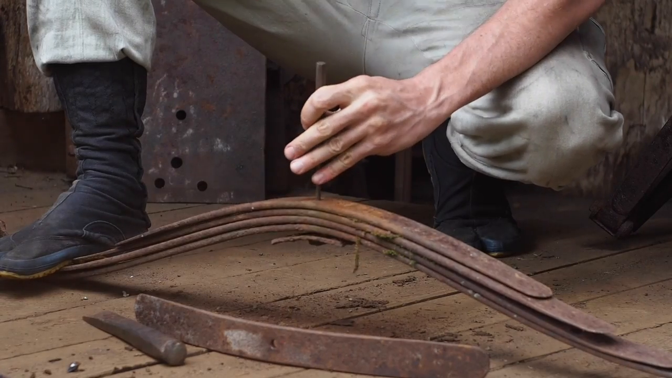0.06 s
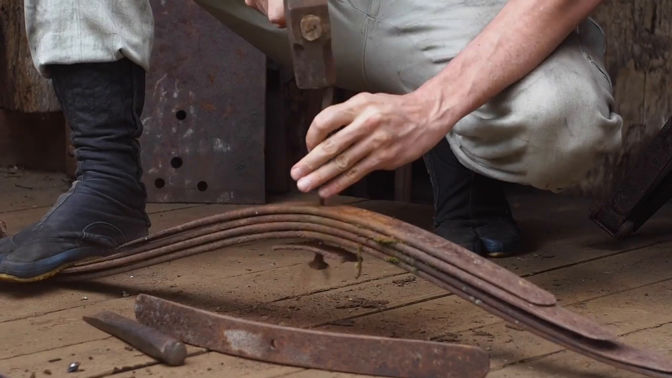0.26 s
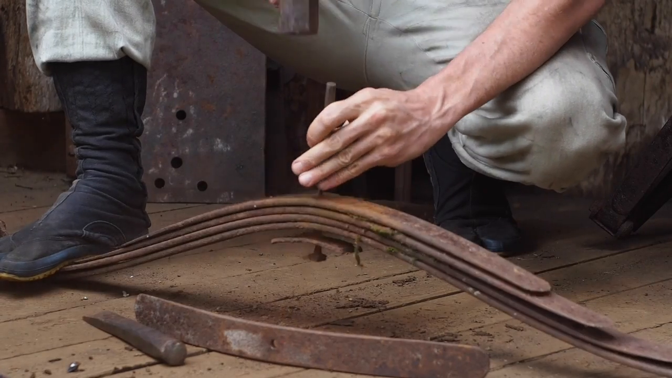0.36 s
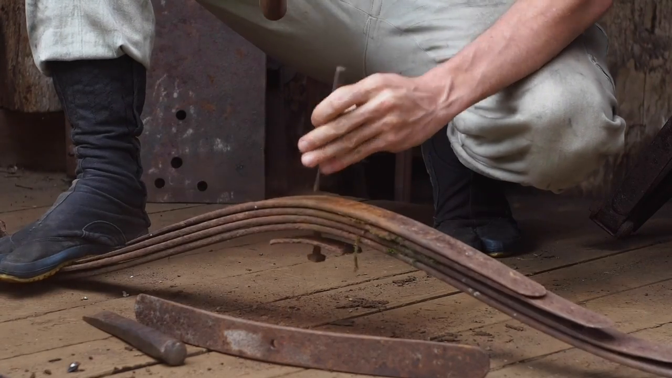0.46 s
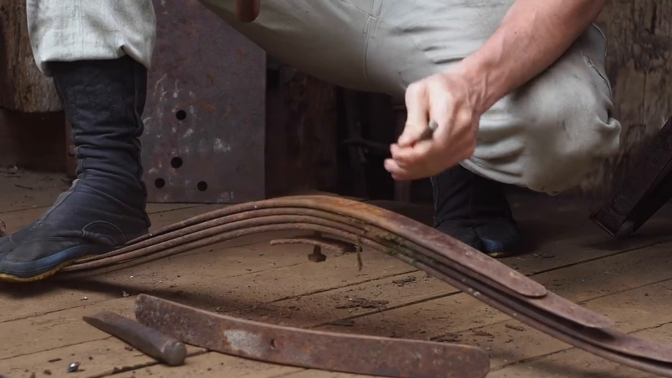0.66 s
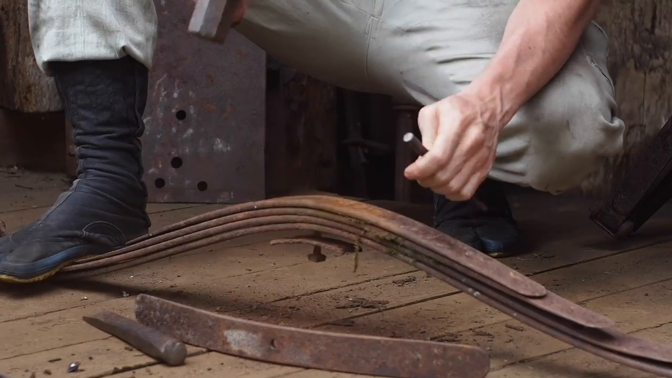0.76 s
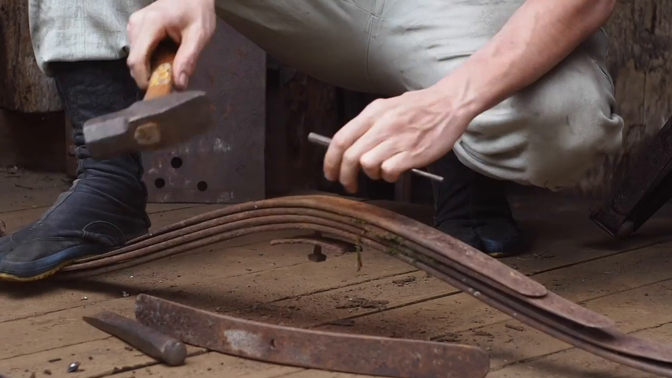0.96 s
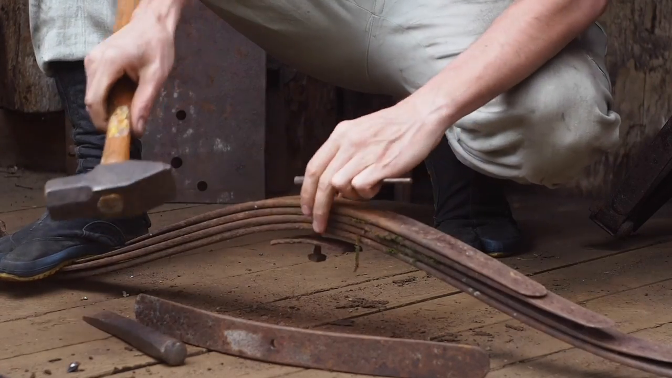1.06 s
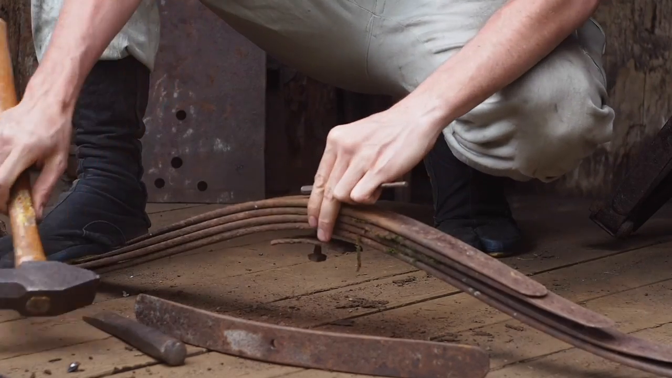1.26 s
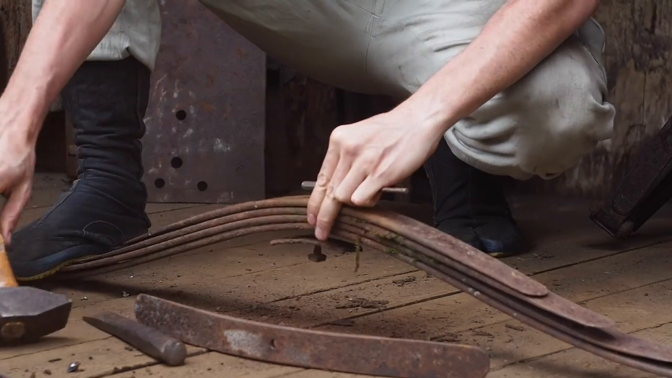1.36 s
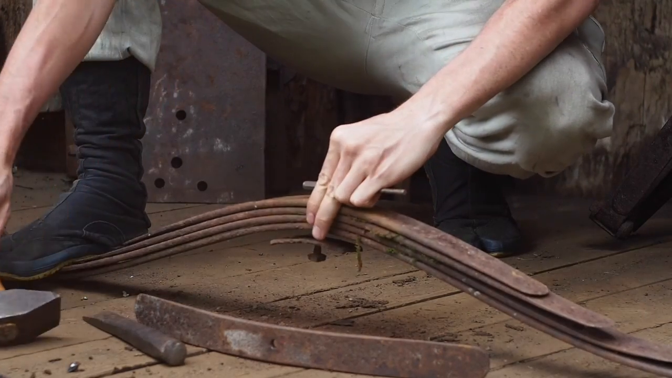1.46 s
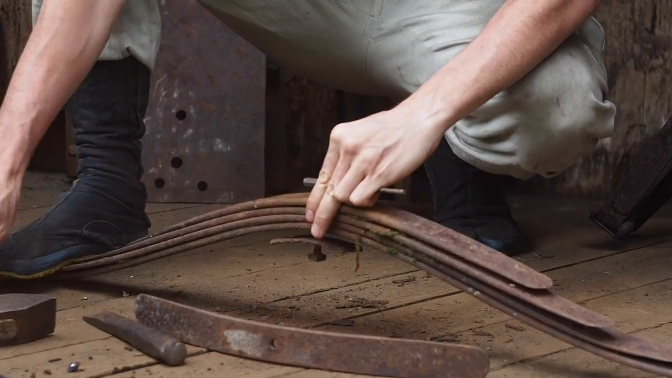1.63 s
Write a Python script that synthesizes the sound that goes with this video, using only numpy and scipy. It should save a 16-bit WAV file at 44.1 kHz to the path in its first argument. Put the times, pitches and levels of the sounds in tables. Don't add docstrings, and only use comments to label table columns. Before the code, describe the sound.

A hammer cracks once on a punch against stacked rusty spring steel; leaves clap and ring brightly. Later the punch clinks down and the hammer knocks onto planks, close stereo microphones in a small wooden workshop.

```python
import sys
import numpy as np
from scipy import signal
from scipy.io import wavfile
from scipy.ndimage import uniform_filter1d

SR = 44100
rng = np.random.default_rng(int(sys.argv[2]) if len(sys.argv) > 2 else 0)


def how_loud(loudness_db):
    steps = np.asarray(loudness_db, float) / 20
    return 10 ** steps


def materialize(psi):
    bounded = np.clip(np.atleast_2d(psi).T, -1, 1)
    quanta = np.round(bounded * 32767).astype(np.int16)
    wavfile.write(sys.argv[1], SR, quanta)


N = 74970
T = np.arange(N) / SR
BLOW_S = 0.22725


def unit(x):
    return x / np.sqrt(np.mean(x ** 2) + 1e-20)


def along(points, hz):
    f, v = np.transpose(points)
    return np.interp(np.log(hz + 1), np.log(f + 1), v)


def pan(db):
    return how_loud([[db / 2], [-db / 2]])


def since(s):
    return np.clip(T - s, 0, None)


def swell(s, rise_s):
    return 1 - np.exp(-since(s) / rise_s)


def ring(modes, s, db, rise_s, scatter_db=0, spread=1):
    spread_rad, spread_db = 0.67 * spread, 1 * spread
    out = np.zeros((2, N))
    start = round(max(s, 0) * SR)
    hz, level, t60, pan_db = np.transpose(modes)[..., None]
    t = T[:min(N - start, int(t60.max() * SR) + 1)]
    level_u, pan_u, phase_u, phase = rng.standard_normal((len(hz), 4)).T[..., None]
    for ch, side in enumerate((1, -1)):
        side_db = side * (pan_db / 2 + spread_db * pan_u)
        gain = how_loud(db + level + scatter_db * level_u + side_db - 60 * t / t60)
        side_phase = side * spread_rad * phase_u * hz / 5000
        wave = np.sin(2 * np.pi * hz * t + phase + side_phase)
        out[ch, start:start + len(t)] = np.sum(gain * wave, axis=0)
    return out * swell(s, rise_s)


def puff(colour, decay, s, db, alike):
    lead = 512
    hz, t, z = signal.stft(rng.standard_normal((2, SR // 2)), SR, nperseg=256)
    fall_db = 60 * np.clip(t - lead / SR, 0, None) / along(decay, hz)[:, None]
    z = z * how_loud(along(colour, hz)[:, None] - fall_db)
    mid, side = signal.istft(z, SR, nperseg=256)[1][:, lead:]
    pair = np.array([mid + side * (1 - alike), mid - side * (1 - alike)])
    out = np.zeros((2, N + SR))
    start = round(s * SR)
    out[:, start:start + len(mid)] = how_loud(db) * pair / np.sqrt(np.mean(how_loud(along(colour, hz)) ** 2))
    return out[:, :N]


# frequency in Hz, correlation.
ALIKE = [(60, 0.82), (240, 0.961), (930, 0.83), (3640, -0.43), (14300, 0.13)]


def rush(colour, patchy_db):
    hz, _, z = signal.stft(rng.standard_normal((2, N + SR // 8)), SR, nperseg=1024)
    field = uniform_filter1d(rng.standard_normal(z.shape[1:]), size=8, axis=0)
    field = uniform_filter1d(field, size=5, axis=1)
    turn = np.arccos(np.clip(along(ALIKE, hz), -1, 1)) / 2
    mid_side = how_loud(along(colour, hz)) * np.array([np.cos(turn), np.sin(turn)])
    z = z * how_loud(patchy_db * unit(field)) * mid_side[..., None]
    mid, side = signal.istft(z, SR, nperseg=1024)[1][:, :N]
    return unit(np.array([mid + side, mid - side]))


# frequency in Hz, level in dB.
AIR = [(30, -33), (80, -6), (250, -2), (430, 2), (800, -7.5), (1900, -21.5), (7000, -26), (15000, -41)]
# time in seconds, level in dB.
RUSTLE = [
    (0.601, -83.5),
    (.75, -75),
    (.85, -68),
    (1.05, -71),
    (1.3, -83.5),
    (1.45, -68),
    (1.7, -63.5),
]
# frequency in Hz, level in dB.
CLOTH = [(1500, -22), (3000, -3), (5000, 0), (8000, -4), (10000, -14.5), (14000, -31)]


def air():
    s, db = np.transpose(RUSTLE)
    sleeves = how_loud(np.interp(T, s, db)) * rush(CLOTH, patchy_db=4.0)
    return how_loud(-51.5) * rush(AIR, patchy_db=1.5) + sleeves


def centred(freqs, rows):
    return [(hz, *row, 0) for hz, row in zip(freqs, rows)]


EARLIER_HZ = [1701.5, 3510, 5179, 8850]
# level in dB, t60 in seconds.
EARLIER = [(-43.5, 2.5), (-68, .8), (-70, .3), (-72, .35)]


def earlier_ring():
    stopped = np.clip((BLOW_S - T) / 0.002, 0, 1)
    return ring(centred(EARLIER_HZ, EARLIER), -1, 0, 0.1, spread=0) * stopped


LOW_HZ = [1701.5, 1896, 1938, 2401, 2599, 2695, 2736, 2957, 3430, 3509, 3599, 4252, 4289, 5005]
HIGH_HZ = [5180, 5301, 5627, 5808, 6462, 6659, 6844, 7362, 7543, 7755, 8503, 8846, 9010, 9838]


def spring(rows):
    return [(hz, *row) for hz, row in zip(LOW_HZ + HIGH_HZ, rows)]


# level in dB, t60 in seconds, L-R in dB.
LAID = [(-65.5, 1.5, 1.5), (-46.5, 0.714, -4), (-53, 0.41, 3.5), (-42.5, 0.337, -4), (-40.5, 0.521, -8.5),
        (-56, 0.39, -2), (-61.5, .22, -3), (-50.5, 0.403, -5.5), (-57.5, 0.63, -10), (-61, .6, -2),
        (-34, .26, 0), (-35, .21, -3), (-37, .22, -3), (-36, .14, 2), (-52, .3, -7), (-38, .47, 7),
        (-36, .34, 9), (-27, .12, -7), (-50, 0.28, -1), (-32, 0.245, -9), (-46, 0.385, 3), (-25, 0.217, 9),
        (-23, 0.1815, -9), (-30, 0.261, 1), (-30, 0.123, -5), (-52, 0.65, 1.5), (-36, 0.203, -9),
        (-64, 0.74, -8)]
PUNCH_HZ = [1090, 1400, 2027, 8083, 9444, 9936, 10400, 11050, 11900, 13000]
# level in dB, t60 in seconds.
PUNCH = [(-43, 0.1425), (-50.5, 0.167), (-49, 0.304), (-30.5, 0.198), (-35.5, 0.094), (-33.5, 0.169),
         (-42.5, 0.164), (-42, 0.13), (-49.5, 0.068), (-49.5, 0.097)]


def laid_modes():
    return spring(LAID), centred(PUNCH_HZ, PUNCH)


# frequency in Hz, level in dB.
CLATTER = [(300, -17.5), (1200, -6), (2500, -1.5), (5500, 4.5), (8000, 2), (11000, -18.5), (15000, -52)]
# frequency in Hz, t60 in seconds.
CLATTER_T60 = [(500, 0.56), (3000, 0.28), (8000, 0.2), (14000, 0.1)]


def rattle(s, db, centre_hz, octaves, t60, count=40):
    u = rng.standard_normal((count, 2))
    hz = np.clip(centre_hz * 2 ** (octaves * u[:, 0]), 100, 13500)
    modes = np.c_[hz, along(CLATTER, hz), t60 * np.exp(0.4 * u[:, 1]), 0 * hz]
    hiss = puff(CLATTER, CLATTER_T60, s, db + 8.5, alike=0.85) * swell(s, 0.00071)
    return ring(modes, s, db, 0.00076, scatter_db=4.0) + hiss


# start in seconds, ring in dB, rattle in dB, rattle centre in Hz.
TICKS = [
    (0.132, -48.5, -72.5, 5930),
    (0.454, -56, -59.5, 7990),
    (.758, -51, -70, 5727),
    (1.383, -37.5, -62.5, 5479),
    (1.471, -56.5, -70, 7500),
    (1.515, -48, -84.5, 6940),
    (1.621, -43, -71, 7580),
]


def ticks():
    springs, punch = laid_modes()
    touched = (springs + punch[3:7])[15:]
    upper = [(hz, 0.44 * db, 0.1, pan_db) for hz, db, _, pan_db in touched]
    out = 0
    for s, db, rattle_db, hz in TICKS:
        scrape = rattle(s, rattle_db, hz, 1.0, 0.032, count=14) * how_loud(-400 * since(s))
        out = out + ring(upper, s, db - 14.5, 0.0008, scatter_db=5.5) + scrape
    return out


# frequency in Hz, level in dB.
CRACK = [(2600, -26), (4800, -8), (5500, 3), (6500, 1.5), (8200, 1), (9800, -5.5), (12500, -21)]


def crack():
    return ring([(hz, db, 0.0051, -2.5) for hz, db in CRACK], BLOW_S, 5, 0.00027, spread=0.23)


# level in dB, t60 in seconds, L-R in dB.
BLOWN = [(-50.5, 1.6, 1.5), (-46.5, 0.58, 0), (-37, 0.62, -3.5), (-39, 0.27, -2.5), (-35.5, .39, -9),
         (-33, .4, -4), (-33, .35, -4.5), (-33, .34, 5.5), (-38.5, .4, -0.5), (-34.5, 0.71, -2.5),
         (-41.5, .37, -3.5), (-28, .13, 0), (-29, 0.25, 0), (-27, .2, 0),
         (-35.5, .55, -5.5), (-38.5, 0.27, 4.5), (-27.5, 0.23, -3), (-20.5, 0.17, -10), (-29, .3, 0),
        (-17.5, 0.2, 8), (-27.5, .6, -5), (-27, 0.24, 7), (-27, .2, -8.5), (-33, .2, -5.5), (-36, .19, 0.5),
        (-39.5, .46, 0.5), (-34, .2, -2.5), (-46.5, .3, -5.5)]
# seconds after the blow, ring in dB, rattle in dB, centre in Hz, floor thud in dB.
CLAPS = [
    (.0012, -40.5, -33.5, 6089, -25.5),
    (0.015, -24, -37.5, 4575, -28),
    (0.0307, -30, -34.5, 7636, -35.5),
    (0.0563, -19, -38, 2801, -32),
    (0.0752, -35.5, -43, 4686, -40),
    (0.1262, -20, -45.5, 2508, -29),
]


def blow():
    modes = spring(BLOWN)
    out = ring(modes, BLOW_S, -0.45, 0.00061, spread=0.16)
    for after_s, ring_db, rattle_db, hz, _ in CLAPS:
        s = BLOW_S + after_s
        out = out + ring(modes, s, ring_db, 0.0011, scatter_db=3)
        out = out + rattle(s, rattle_db, hz, octaves=0.7, t60=0.073)
    return out


# frequency in Hz, level in dB, t60 in seconds.
BOARDS = [(76.2, -23, 0.1), (108.8, -19, 0.28), (152, -22, 0.23), (187, -15.5, 0.12), (281.6, -2.5, 0.14),
          (321.43, -5, 0.13), (364.1, -8.5, 0.12), (481.5, -11.5, 0.14), (637, -11.5, 0.05),
          (1040, -15, 0.06)]
# start in seconds, boards in dB, knock in dB.
SET_DOWN = [
    (1.3955, -20, -27.5),
    (1.401, -24, -28.5),
    (1.409, -20.5, -30.5),
    (1.43, -28.5, -34.5),
    (1.443, -35.5, -34.5),
    (1.456, -27.5, -44),
    (1.474, -66.5, -43),
    (1.503, -44.5, -61),
    (1.694, -31.5, -50),
]
# frequency in Hz, level in dB.
KNOCK = [(60, -22.5), (150, 3.5), (350, 3.5), (1000, -6), (2200, -17.5), (4000, -32), (9000, -61.5)]
# frequency in Hz, t60 in seconds.
KNOCK_T60 = [(100, 0.5), (500, 0.12), (2500, .05)]
BOARDS_HIGH_PASS = signal.butter(4, 68, "high", fs=SR, output="sos")


def boards():
    modes = [(*row, 0) for row in BOARDS]
    thuds = [(BLOW_S + after_s, db, db - 8.0) for after_s, _, _, _, db in CLAPS]
    out = 0
    for s, db, knock_db in list(SET_DOWN) + thuds:
        knock = puff(KNOCK, KNOCK_T60, s, knock_db, alike=0.71) * swell(s, 0.0038)
        out = out + ring(modes, s, db, 0.0018, scatter_db=4.0, spread=0.099) + knock
    return signal.sosfilt(BOARDS_HIGH_PASS, out)


FREED_HZ = [9608, 11203, 12260, 12875, 13950, 6462, 9838, 6844, 8503, 9010, 2695, 2957, 3509, 5180, 5627,
            340, 1060, 4252, 4289, 9838]
# start in seconds, level in dB, t60 in seconds, L-R in dB.
FREED = [(.229, -38, .2, 0), (.229, -42, .25, -3), (.229, -48, .2, -4), (.229, -50, .2, 0),
         (.247, -56, .15, 0), (.25, -27, .25, 3), (.25, -42, .25, -10), (.262, -16, .22, -4),
         (.262, -29, .15, 6), (.262, -34, .25, -10), (.283, -27, .14, 0), (.283, -33, .3, 3),
         (.3, -41, .8, -2), (.298, -30, .12, -2), (.31, -33, .3, 0), (.352, -38, .12, 1),
         (.352, -37, .1, 0), (.34, -32, .3, 0), (.34, -35, .3, 0), (.4, -60, .45, -14)]


def leaves():
    return sum(ring([(hz, *row)], s, 0, 0.0029, spread=0.3) for hz, (s, *row) in zip(FREED_HZ, FREED))


TINK_HZ = [5806, 7773, 13000]
# level in dB, t60 in seconds, L-R in dB.
TINK = [(-43.5, 0.149, -3), (-44.5, 0.152, -17.5), (-61.5, 0.055, -1)]


def tink():
    modes = [(hz, *row) for hz, row in zip(TINK_HZ, TINK)]
    return ring(modes, 0.454, 0, 0.000444, spread=0.54)


def tap():
    tap_s, hand_s, hand_db_per_s = 1.1178, 1.225, -63
    springs, punch = laid_modes()
    rung = ring(springs + punch, tap_s, -0.44, 0.0011, spread=0.25)
    clatter = rattle(tap_s, -47.5, 6000, 0.63, 0.32) * how_loud(-150 * since(tap_s))
    return rung * how_loud(hand_db_per_s * since(hand_s)) + clatter


# frequency in Hz, t60 in seconds.
ROOM = [(150, 0.22), (1000, 0.38), (5000, 0.34), (12000, 0.21)]


def room(x):
    tail = puff([(100, 0)], ROOM, 0.004, 0, alike=0.99)[:, :SR // 2]
    tail = tail / np.linalg.norm(tail[0])
    return signal.fftconvolve(x.mean(0)[None], tail, axes=1)[:, :N]


def scene():
    steel = earlier_ring() + ticks() + crack() + blow() + leaves() + tink() + tap()
    steel = steel * pan(0)
    wood = boards() * pan(0.56)
    wet = room(how_loud(-17.5) * steel + how_loud(-16.5) * wood)
    return steel + wood + wet + air()


def low_pass(x):
    return signal.sosfilt(signal.butter(12, 15500, fs=SR, output="sos"), x)


def record(dry):
    duck_db, delay_s, fall_s, recover_s = -4, 0.001085, 0.00036, 0.0449
    ceiling, knee = 0.92, 14
    t = np.clip(T - BLOW_S - delay_s, 0, None)
    x = dry * how_loud(duck_db * (1 - np.exp(-t / fall_s)) * np.exp(-(t / recover_s) ** 2))
    x = x / (1 + np.abs(x / ceiling) ** knee) ** (1 / knee)
    bass_cut = signal.butter(2, 40, "high", fs=SR, output="sos")
    return low_pass(signal.sosfilt(bass_cut, x))


dry = scene()
out = record(dry)
materialize(out)
```